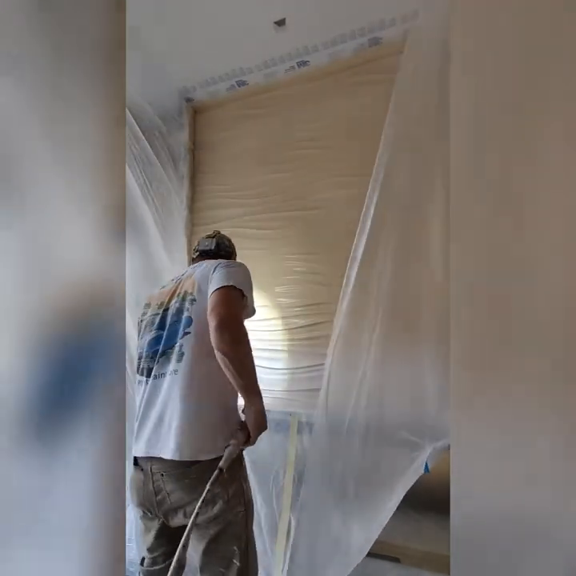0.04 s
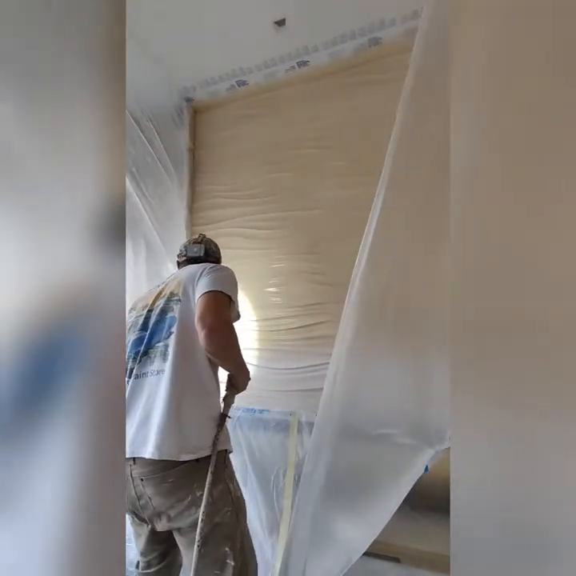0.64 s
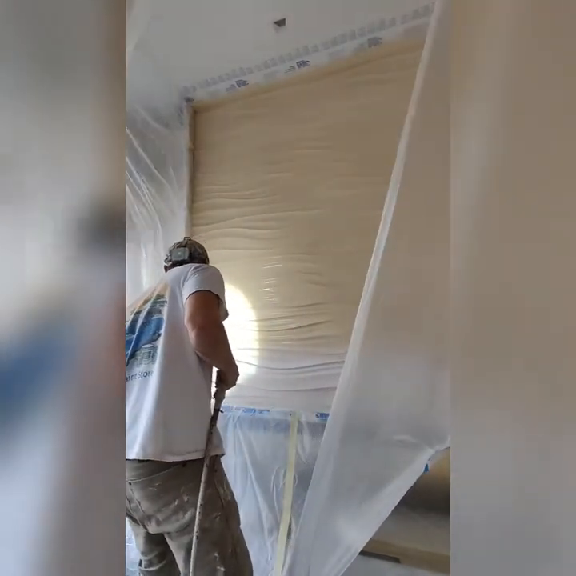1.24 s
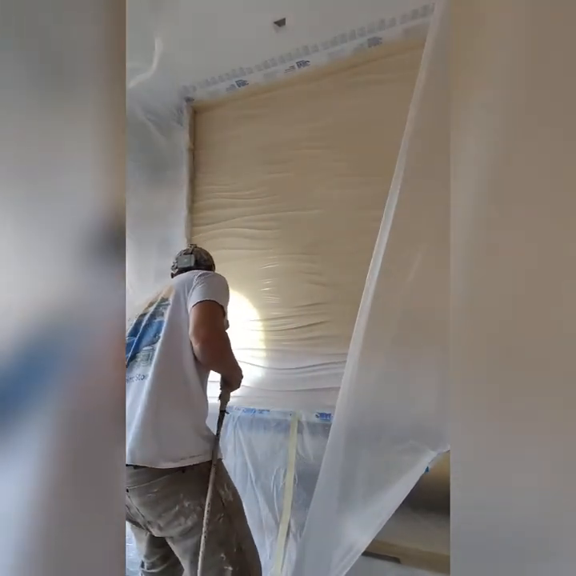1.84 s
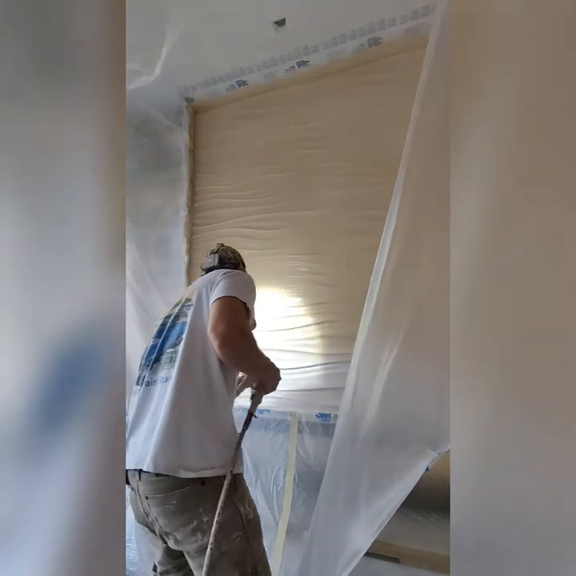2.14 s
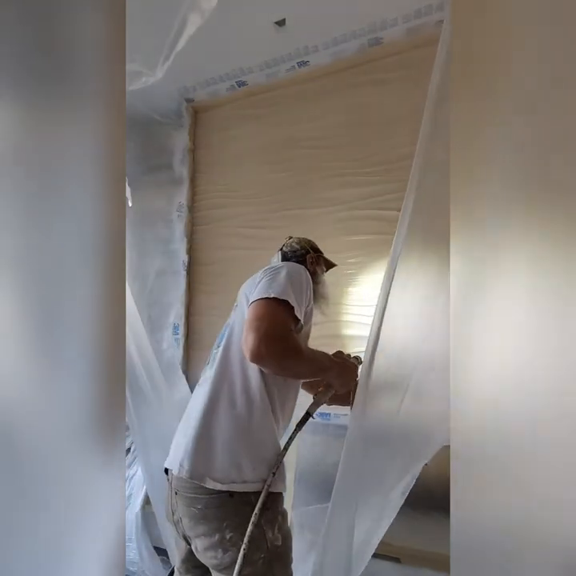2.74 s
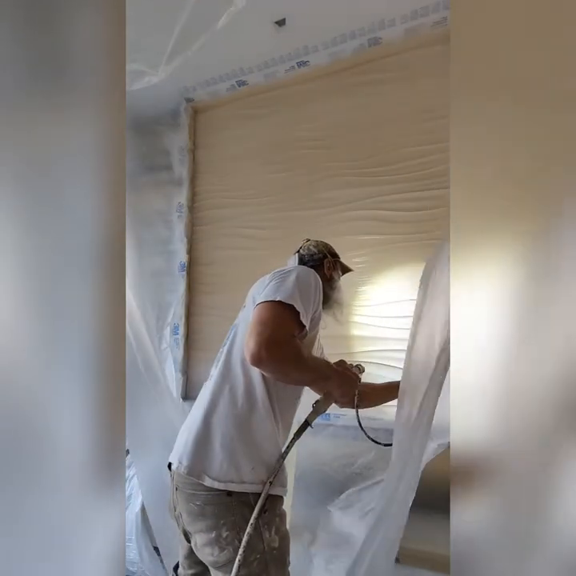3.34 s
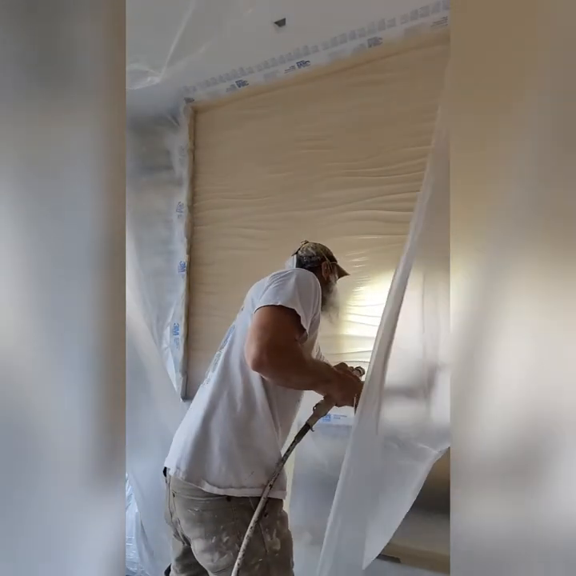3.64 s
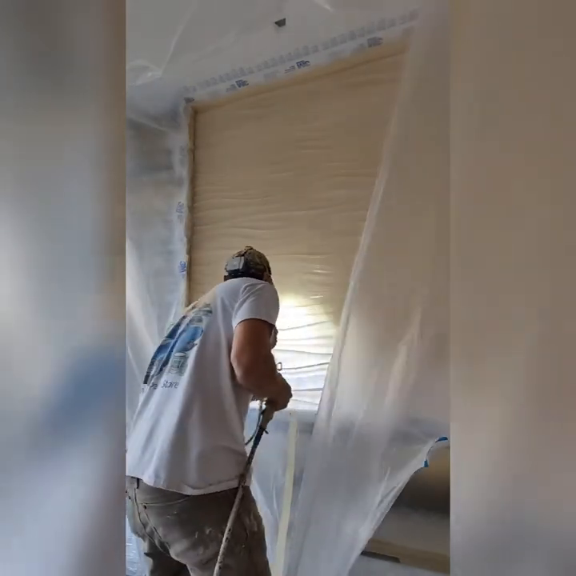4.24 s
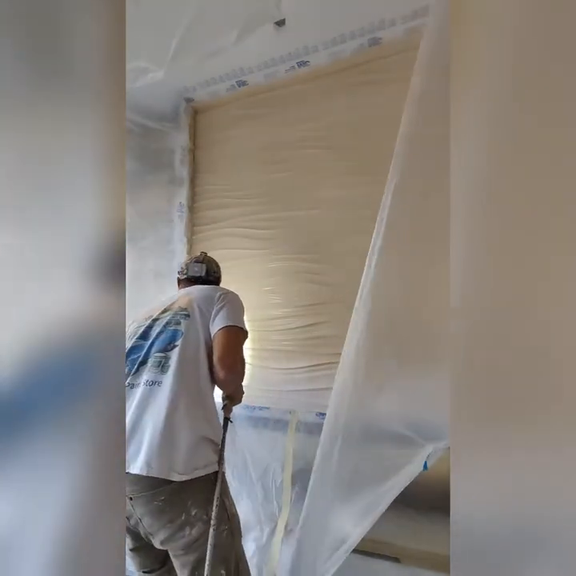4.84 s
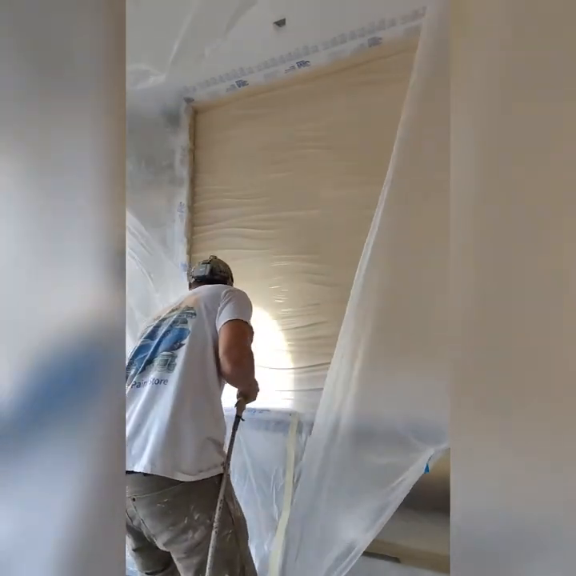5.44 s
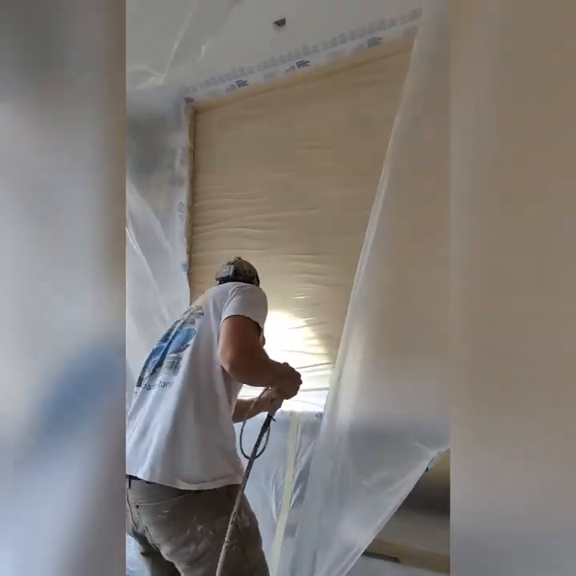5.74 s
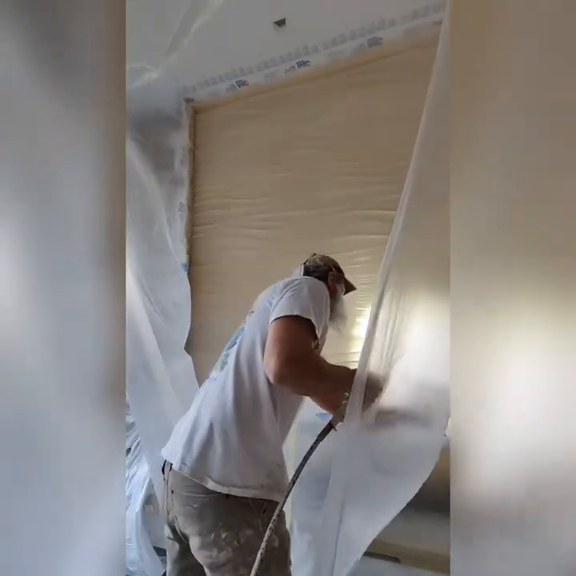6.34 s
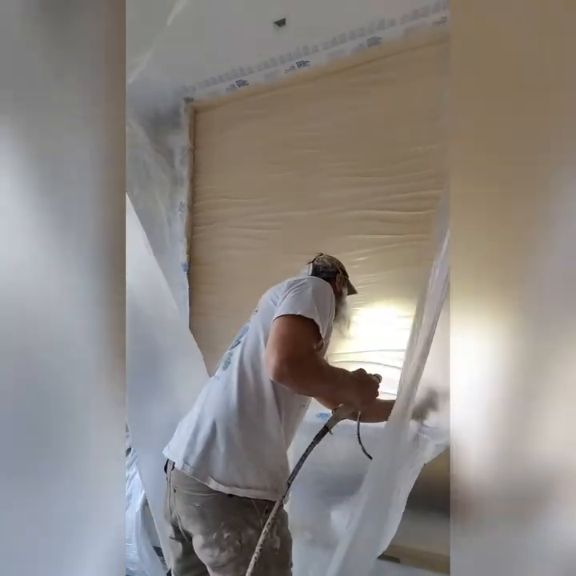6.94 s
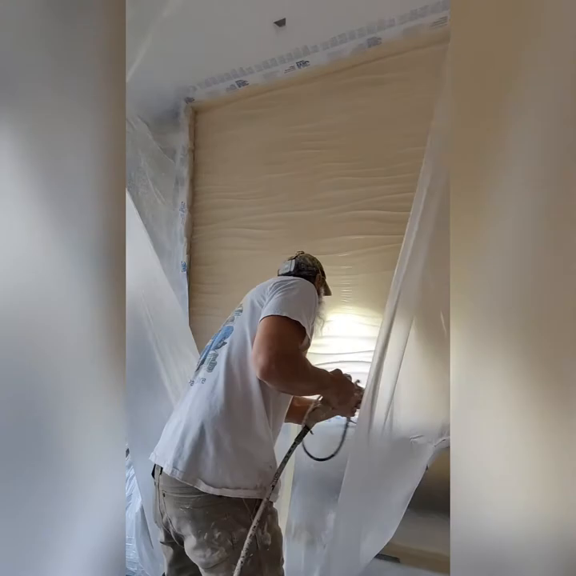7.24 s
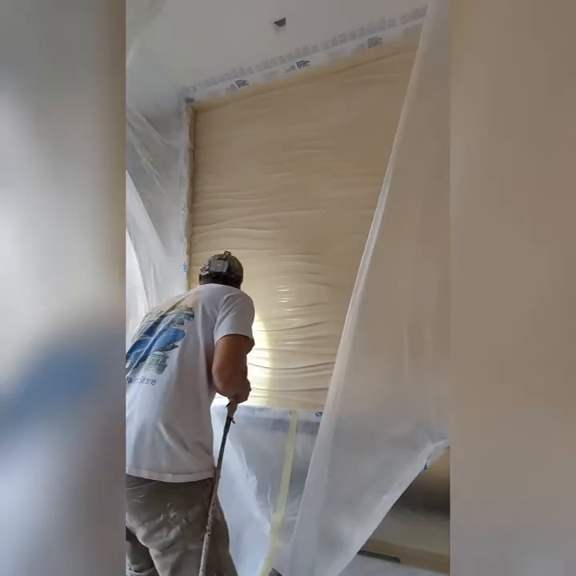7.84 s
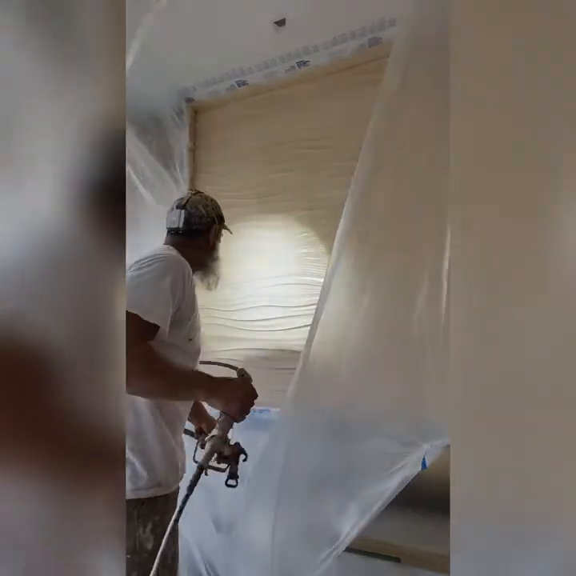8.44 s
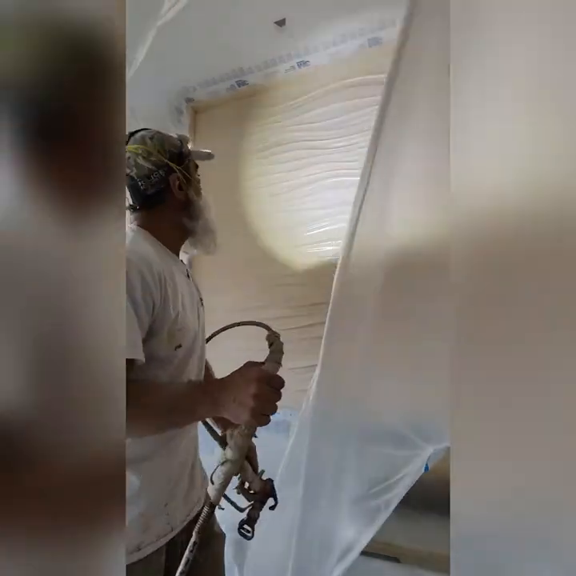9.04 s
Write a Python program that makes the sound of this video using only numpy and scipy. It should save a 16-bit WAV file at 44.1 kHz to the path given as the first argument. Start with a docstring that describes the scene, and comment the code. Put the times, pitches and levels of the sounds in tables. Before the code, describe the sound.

In a room, a nearby airless paint gun sprays a wall five times: one quick burst, then four of about a second each. Every pull spits open, hisses brightly and sputters shut, leaving a soft lingering hiss. Further off, a piston pump faintly hums and rushes. Past halfway a motor cuts in and climbs to a fuzzy whine, and a soft scuff follows the last burst.

```python
"""An airless spray gun coats a wall in five trigger pulls, in a room hung with plastic sheeting.
Each pull spits as the needle valve opens, hisses as the jet atomises and pelts the wall, and sputters shut.
A soft hiss lingers between pulls; the painter shifts and scuffs. Further off a piston pump hums and
rushes, then a motor spins up, its vanes chopping the air into a rising, fuzzy whine."""
import sys
import numpy as np
from scipy import signal
from scipy.fft import rfft, irfft
from scipy.io import wavfile
from scipy.ndimage import uniform_filter1d

SR = 44100
rng = np.random.default_rng(int(sys.argv[2]) if len(sys.argv) > 2 else 0)


def store_pcm(level_fs):
    """Save levels as 16-bit WAV."""
    pcm = np.round(np.clip(level_fs, -1, 1) * 32767).astype(np.int16)
    wavfile.write(sys.argv[1], SR, np.atleast_2d(pcm).T)


N = 400428
TIME = np.arange(N) / SR
SPIN_FROM_S = 4.72  # shaft starts to speed up

# trigger pulls: on/s, off/s, hiss/dB, change over sweep/dB, extra treble/dB, pelting/dB, drumming/dB,
# opening splatter/dB, opening puff/dB, closing sputter/dB, sputter lead/s, lingering hiss/dB
TRIGGER_PULLS = [(1.252, 1.479, -31, -3, 2.5, -45.5, -53, -41, -43.5, -57, 0.012, -60),
                 (2.035, 2.92, -33, 2.5, 4.5, -48, -55.5, -42, -41.5, -53, 0.027, -46.5),
                 (3.722, 4.867, -30, -3.5, 2, -43.7, -55.5, -45, -44, -48.5, 0.032, -50.5),
                 (5.467, 6.52, -33.1, 2.5, 3, -48.5, -62, -43, -45.5, -50.5, 0.026, -49.5),
                 (7.098, 8.026, -32, -2.2, 1.3, -46.5, -66, -48, -56, -44.5, .09, -46.5)]
# surge of pump and motor: f/Hz, density/dB
SURGE_SPECTRUM = [(300, -19.5), (700, -12), (1000, -3), (1500, -4), (1950, -4), (2400, -10), (4500, -14.5),
                  (12000, -32)]


def amp(db):
    """Decibels to gain."""
    return 10 ** (np.asarray(db) / 20)


def unit(x):
    """Scale to rms 1."""
    return x / np.sqrt(np.mean(x ** 2) + 1e-20)


def ease(start_s, length_s):
    """S-curve from 0 to 1."""
    return .5 - .5 * np.cos(np.pi * np.clip((TIME - start_s) / length_s, 0, 1))


def bell(middle_s, sigma_s):
    """Gaussian swell and ebb."""
    return np.exp(-((TIME - middle_s) / sigma_s) ** 2 / 2)


def swell(start_s, rise_s, decay_s):
    """Linear rise, exponential decay."""
    age_s = TIME - start_s
    return np.clip(age_s / rise_s, 0, 1) * np.exp(-np.maximum(age_s - rise_s, 0) / decay_s)


def read(points, hz):
    """Interpolate (f/Hz, value) points over log frequency."""
    f, value = np.transpose(points)
    return np.interp(np.log(hz + 1), np.log(f + 1), value)


def colour(x, spectrum):
    """Filter by (f/Hz, level/dB) points; rms 1."""
    return unit(irfft(rfft(x) * amp(read(spectrum, np.fft.rfftfreq(N, 1 / SR))), N))


def noise(spectrum):
    """Turbulence with a given spectrum."""
    return colour(rng.standard_normal(N), spectrum)


def wander(rate_hz):
    """Low-passed random motion, rms 1."""
    hz = np.fft.rfftfreq(N, 1 / SR)
    return unit(irfft(rfft(rng.standard_normal(N)) / (1 + (hz / rate_hz) ** 2), N))


def fuzzy_tone(angle, width_hz):
    """Tone smeared into a band by wandering strength and phase."""
    return wander(width_hz / 2) * np.cos(angle) + wander(width_hz / 2) * np.sin(angle)


def droplets(per_s, spread_db):
    """Tiny random impacts, a few of them large."""
    size = amp(spread_db * np.minimum(rng.exponential(1, N), 4))
    return unit(size * rng.standard_normal(N) * (rng.random(N) < per_s / SR))


def shifting_reflections(x, depth_db):
    """Near reflections shift as things move: patches of the spectrum swell and fade."""
    spectra = signal.stft(x, nperseg=512)[2]
    patches = uniform_filter1d(rng.standard_normal(spectra.shape), size=6, axis=0)
    patches = unit(uniform_filter1d(patches, size=24, axis=1))
    return unit(signal.istft(spectra * amp(depth_db * patches))[1][:N])


def echo_tail(taps_per_s=4000, gap_s=.004):
    """Dense wall reflections; the midrange rings longest."""
    # reverberation time: f/Hz, T60/s
    t60 = [(100, 0.17), (500, 0.73), (2000, 0.91), (7000, 0.54), (15000, 0.28)]
    taps = rng.standard_normal(SR) * (rng.random(SR) < taps_per_s / SR) * (TIME[:SR] > gap_s)
    hz, t, spectra = signal.stft(taps, SR, nperseg=256)
    decay = amp(-60 * t / read(t60, hz)[:, None])
    tail = signal.istft(spectra * decay, SR, nperseg=256)[1]
    return tail / np.linalg.norm(tail)


def room(x, wet_db, positions=20):
    """The gun moves: each reflection pattern fades into the next at constant power."""
    place = np.linspace(0, positions - 1, N)
    wet = np.zeros(N)
    for k in range(positions):
        share = np.sqrt(np.maximum(1 - abs(place - k), 0))
        wet += signal.oaconvolve(x * share, echo_tail())[:N]
    return (x + amp(wet_db) * wet) / np.hypot(1, amp(wet_db))


def room_tone(rumble_db=-72, drone_db=-78, drone_hz=60):
    """Building rumble and a faint, wavering drone."""
    # rumble: f/Hz, density/dB
    rumble_spectrum = [(20, -21), (45, -3), (70, 3), (95, -17), (130, -12), (170, -11), (280, -1),
                       (400, -1), (520, -2), (700, -23), (1200, -11), (4000, -15), (15000, -34)]
    angle = 2 * np.pi * drone_hz * TIME
    drone = np.sin(angle) + .5 * fuzzy_tone(angle, width_hz=12)
    return amp(rumble_db) * noise(rumble_spectrum) + amp(drone_db) * drone


def vane_whine(shaft_hz, angle, build_s=.54):
    """Vanes chop the air; turbulence smears each tone and the housing favours some pitches."""
    # vane tones: multiple of shaft rate, width/Hz, beat depth
    tones = [(12, 28, .15), (18.2, 95, .2), (23.8, 76, .3), (47.6, 380, .2)]
    # entry of each tone: t/s, level before housing/dB
    entries = [(6.4, -53), (6.1, -58), (5.29, -49), (6.3, -59)]
    # housing response: f/Hz, gain/dB
    housing = [(780, -19), (850, -6), (880, -2), (915, -6), (945, -0.7), (1090, -1), (1150, -3), (1280, 0),
               (1370, -5.5), (1450, -6.5), (1620, -9), (1770, -8), (1860, -3.5), (3700, -9)]
    whine = np.zeros(N)
    for (order, width_hz, depth), (start_s, db) in zip(tones, entries):
        # uneven vanes: sidebands one and two shaft rates away
        sidebands = fuzzy_tone(angle, width_hz=20) + fuzzy_tone(2 * angle, width_hz=20)
        beating = unit(1 + depth * sidebands)
        core = np.cos(order * angle + 2 * wander(width_hz / 4))
        tone = unit(fuzzy_tone(order * angle, width_hz) + core)
        whine += ease(start_s, build_s) * amp(db + read(housing, order * shaft_hz)) * tone * beating
    return whine


def motor(cut_in_s=5.26, spin_up_s=4.05, idle_hz=41, full_hz=78.4, throb=.086, waver_db=1.1):
    """Cuts in with one surge and speeds up: vane whine, cooling air, shaking mount."""
    # cooling air: f/Hz, density/dB
    air_spectrum = [(100, -22), (280, -0.5), (520, -2), (680, -5), (850, 6.5), (1100, 8), (1500, -1.5),
                    (2200, 2.5), (3800, 1.5), (5200, -6), (7500, -3), (10000, -16), (15000, -44)]
    # mount vibration: shaft rate/Hz, level/dB
    mount = [(42, -76), (52, -73), (57, -65), (62, -71), (70, -71), (78, -79)]
    full_air_db, air_db_per_octave = -49.5, 14
    shaft_hz = idle_hz + (full_hz - idle_hz) * ease(SPIN_FROM_S, spin_up_s)
    angle = 2 * np.pi * np.cumsum(shaft_hz) / SR
    whine = vane_whine(shaft_hz, angle)
    air_gain = amp(full_air_db + air_db_per_octave * np.log2(shaft_hz / full_hz))
    air = air_gain * shifting_reflections(noise(air_spectrum), depth_db=2.2) * (1 + throb * np.sin(angle))
    shake = amp(read(mount, shaft_hz)) * fuzzy_tone(angle, width_hz=4.2)
    surge = amp(-54) * swell(cut_in_s, rise_s=.029, decay_s=.27) * noise(SURGE_SPECTRUM)
    return surge + ease(cut_in_s, .04) * (shake + air) + amp(waver_db * wander(5.3)) * whine


def pump(load_s=1.5, hum_db=-1, fade_db_per_s=.3, waver_db=2, running_db=-54, churn_db=1):
    """Mains hum under load, a surge per piston stroke, and a whistling rush of flow."""
    # mains harmonics: f/Hz, level/dB
    harmonics = [(120, -85), (240, -74), (360, -75.5), (480, -80)]
    # piston turns: t/s, surge/dB, rise/s, decay/s, rush/dB
    strokes = [(1.815, -60, 0.0078, 0.076, -58.5), (3.195, -53, .012, 0.14, -54.5),
               (4.775, -51, 0.018, 0.29, -54.5), (6.27, -53, .018, .068, -65)]
    # rush into and out of each turn: delay/s, sigma/s, gain/dB
    lobes = [(-.24, .22, -4.5), (.22, 0.18, -3)]
    # rush: f/Hz, density/dB
    rush_spectrum = [(200, -30), (500, -5.5), (700, -13), (950, -6.5), (1120, 0.5), (1260, 3.5), (1400, -4),
                     (1650, -3.5), (1950, -5), (2500, -14), (5000, -17), (12000, -58)]
    hum = sum(amp(db + waver_db * wander(4)) * np.sin(2 * np.pi * hz * TIME + .5 * wander(3.5))
              for hz, db in harmonics)
    load = ease(load_s, .18) * amp(hum_db - fade_db_per_s * (TIME - load_s))
    surge_gain = sum(amp(db) * swell(t, rise_s, decay_s) for t, db, rise_s, decay_s, _ in strokes)
    surges = surge_gain * noise(SURGE_SPECTRUM)
    stroke_flow = sum(amp(db + lobe_db) * bell(t + delay_s, sigma_s)
                      for t, *_, db in strokes for delay_s, sigma_s, lobe_db in lobes)
    primed = ease(strokes[0][0], .1)
    steady_flow = amp(running_db) * ease(SPIN_FROM_S, 1)
    flow = np.hypot(primed * stroke_flow, steady_flow)
    rush = flow * amp(churn_db * wander(3.8)) * noise(rush_spectrum)
    return rush + surges + np.sqrt(2) * load * hum


def soft_hiss(floor_db=-62.5, fade_db_per_s=17.5, grain=.29):
    """Faint, grainy hiss: lingers after each pull, swells as the painter moves."""
    # hiss: f/Hz, density/dB
    spectrum = [(150, -19), (400, -4.5), (700, -11.5), (1100, -2.5), (2000, -3.5), (4500, 1), (5500, -3),
                (6500, 0.5), (7400, 5), (9000, -1), (12400, 0.5), (13400, 5), (14700, 1.5), (20000, -4)]
    # swells: t/s, level/dB, sigma/s
    swells = [(.06, -56, 0.1), (0.416, -50.5, 0.13), (1.9, -56, .02), (3.365, -54, .035),
              (8.32, -48.5, 0.091), (8.61, -52, .018), (8.82, -54, 0.1)]
    power = amp(floor_db) ** 2 + sum(amp(db) ** 2 * bell(t, sigma_s) for t, db, sigma_s in swells)
    for on_s, off_s, *_, linger_db in TRIGGER_PULLS:
        linger = amp(linger_db - fade_db_per_s * np.maximum(TIME - off_s, 0))
        power += (ease(on_s, off_s - on_s) * linger) ** 2
    grains = rng.standard_normal(N) + grain * droplets(per_s=900, spread_db=2.2)
    return np.sqrt(power) * colour(grains, spectrum)


def soft_blows(blows, lumpy_db):
    """Soft impacts, grit above a dull puff. Rows: t/s, grit/dB, puff/dB, rise/s, decay/s."""
    # grit: f/Hz, density/dB
    grit_spectrum = [(250, -2.5), (600, -0.5), (1150, 4), (1700, -2.5), (2600, 2), (5000, 0.5), (7500, -3),
                     (10000, -2.5), (15800, -29)]
    # puff: f/Hz, density/dB
    puff_spectrum = [(25, -30), (55, -10), (95, -23), (130, -2.5), (250, -2), (380, -1), (500, -2),
                     (700, -14), (1500, -17.5)]
    grit_gain = sum(amp(db) * swell(t, rise_s, decay_s) for t, db, _, rise_s, decay_s in blows)
    puff_gain = sum(amp(db) * swell(t, rise_s, decay_s) for t, _, db, rise_s, decay_s in blows)
    grit = colour(rng.standard_normal(N) + .38 * droplets(per_s=2500, spread_db=1.3), grit_spectrum)
    return amp(lumpy_db * wander(65)) * (grit_gain * grit + puff_gain * noise(puff_spectrum))


def scuffs_and_thuds():
    """The painter's soft steps and scuffs, and a soft low thud as the motor cuts in."""
    # scuffs and thuds: t/s, scuff/dB, thud/dB, rise/s, decay/s
    blows = [(0.12, -58, -76, .05, .06), (0.44, -70, -64, .02, .06), (2.6, -66, -62, .015, .05),
             (4.07, -61, -48, .012, .055), (5.31, -66, -62, .04, .12), (8.26, -58, -53.5, .02, .06),
             (8.345, -45.7, -61, .036, .055)]
    return soft_blows(blows, lumpy_db=1.7)


def spits():
    """The part-open needle throws coarse drops at both ends of each pull."""
    spit_delay_s, spit_rise_s, spit_decay_s = .001, .021, .069
    sputter_rise_s, sputter_decay_s, puff_offset_db = .041, .074, -6.5
    blows = []
    for on_s, off_s, *_, splatter_db, puff_db, sputter_db, lead_s, _ in TRIGGER_PULLS:
        spit = (on_s + spit_delay_s, splatter_db, puff_db, spit_rise_s, spit_decay_s)
        sputter = (off_s - lead_s, sputter_db, sputter_db + puff_offset_db, sputter_rise_s, sputter_decay_s)
        blows += [spit, sputter]
    return soft_blows(blows, lumpy_db=2.7)


def valve(on_s, off_s, open_s=.014, bleed_s=.028):
    """Needle valve flow: snaps open; pressure bleeds away after release."""
    return np.clip((TIME - on_s) / open_s, 0, 1) * np.exp(-np.maximum(TIME - off_s, 0) / bleed_s)


def spray(flutter_db=.5, drop_share=.5):
    """The jet tears into mist at the tip; droplets pelt the wall and make it drum. One arm sweep a pull."""
    # atomising at the tip: f/Hz, density/dB
    hiss_spectrum = [(3000, -31), (4600, -16), (5500, -19), (6300, -6), (6750, -7), (7400, -1.5),
                     (8000, -3), (8900, -5), (10500, -3), (12400, -1), (13300, 3), (14600, 1.5),
                     (20000, -11)]
    # treble shelf: f/Hz, share
    shelf = [(8000, 0.11), (10000, 0.66), (15000, 1)]
    # droplets on the wall: f/Hz, density/dB
    pelting_spectrum = [(60, -43), (150, -15), (250, -8.5), (700, -15), (1000, -6), (2200, -4.5),
                        (3500, -1.5), (4800, 1.5), (5500, 0.5), (8000, -2.5), (15000, -21)]
    # wall and masking drumming: f/Hz, density/dB
    drum_spectrum = [(100, -29), (220, -2.5), (370, 1.5), (520, 1), (700, -8), (1200, -18.5)]
    sweep_s, return_s, return_share = .71, .18, .3  # arm starts back just before release
    dulling_db, pelting_fade_db, drum_fade_db = -2.4, -2, -4.5  # per full sweep
    treble_lag = .61  # share of the sweep's level change that the treble misses
    onset_dip_db, onset_dip_s = -.1, .05  # hiss starts a shade softer as the valve opens
    hiss = shifting_reflections(noise(hiss_spectrum), depth_db=1)
    treble = irfft(rfft(hiss) * read(shelf, np.fft.rfftfreq(N, 1 / SR)), N)
    impacts = rng.standard_normal(N) + drop_share * droplets(per_s=4000, spread_db=5.6)
    pelting = shifting_reflections(colour(impacts, pelting_spectrum), depth_db=2.5)
    drum = noise(drum_spectrum)
    out = np.zeros(N)
    for on_s, off_s, hiss_db, change_db, treble_db, pelting_db, drum_db, *_ in TRIGGER_PULLS:
        sweep = ease(on_s, sweep_s) * (1 - return_share * ease(off_s - return_s, return_s))
        dip_db = onset_dip_db * np.exp(-np.maximum(TIME - on_s, 0) / onset_dip_s)
        treble_gain = amp(treble_db + (dulling_db - treble_lag * change_db) * sweep)
        tip = amp(hiss_db + dip_db + change_db * sweep) * (hiss + (treble_gain - 1) * treble)
        wall = amp(pelting_db + (pelting_fade_db + change_db) * sweep) * pelting
        wall += amp(drum_db + drum_fade_db * sweep) * drum
        out += valve(on_s, off_s) * (tip + wall)
    return amp(flutter_db * wander(41)) * out


def scene():
    """Gun near, machines further off; both channels alike."""
    near = spray() + spits() + scuffs_and_thuds()
    mono = room(near, wet_db=-9) + soft_hiss() + pump() + motor() + room_tone()
    return np.array([mono, mono])


def record(dry):
    """Steep low-pass band limit."""
    edge_hz = 15790
    lowpass = signal.firwin(1023, edge_hz, window=("kaiser", 8), fs=SR)
    return signal.oaconvolve(dry, lowpass[None], "same")


dry = scene()
out = record(dry)
store_pcm(out)
```